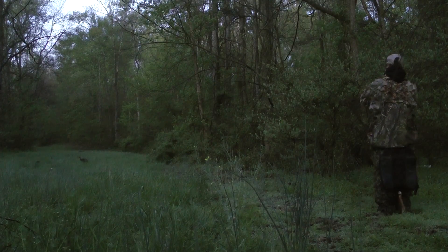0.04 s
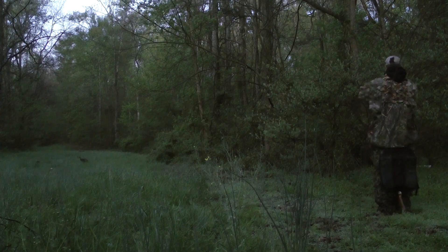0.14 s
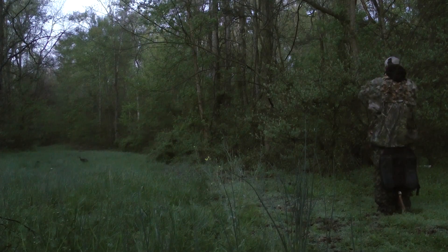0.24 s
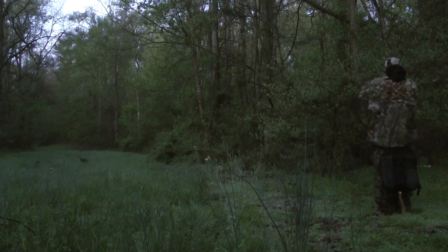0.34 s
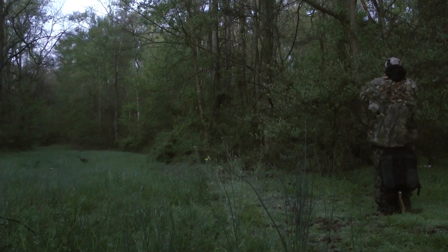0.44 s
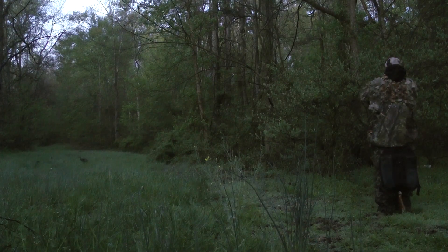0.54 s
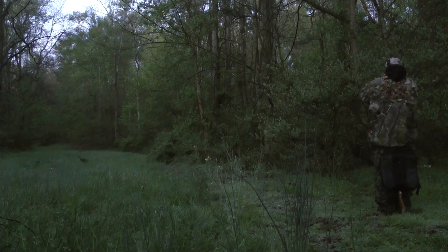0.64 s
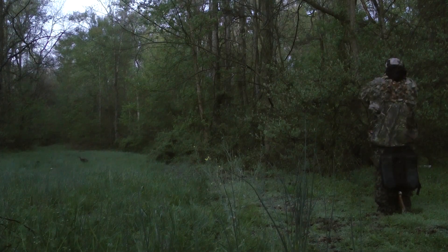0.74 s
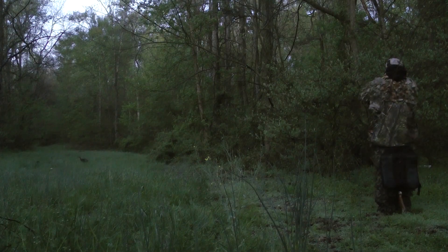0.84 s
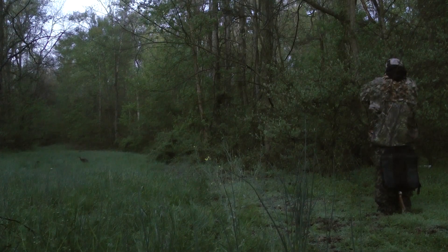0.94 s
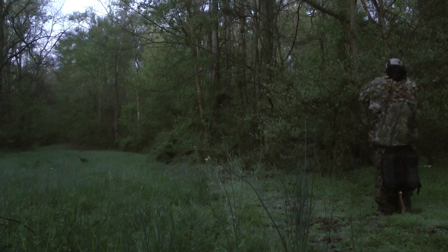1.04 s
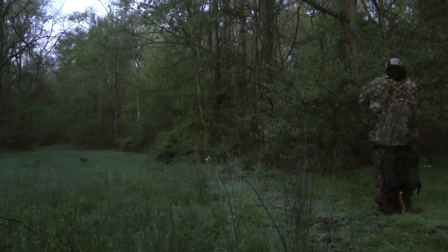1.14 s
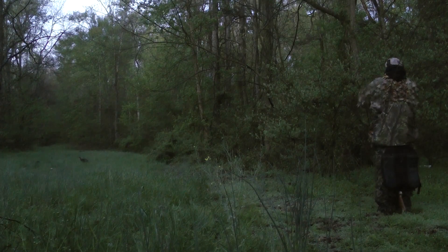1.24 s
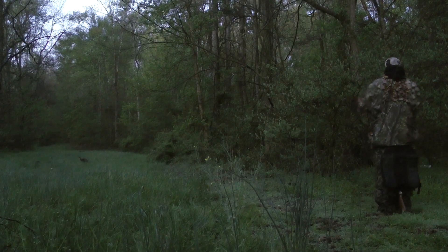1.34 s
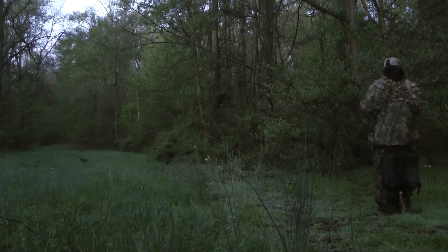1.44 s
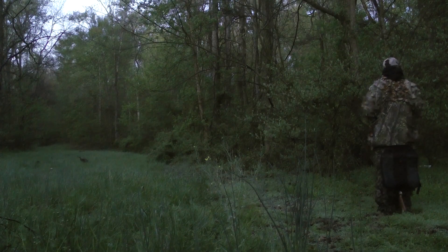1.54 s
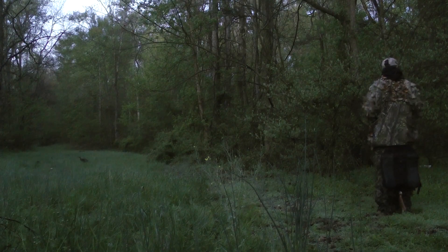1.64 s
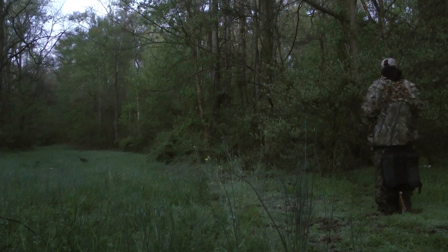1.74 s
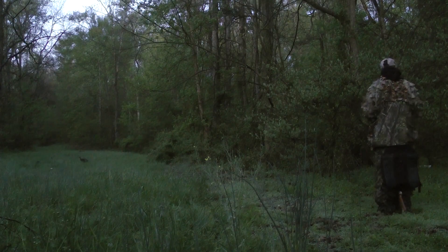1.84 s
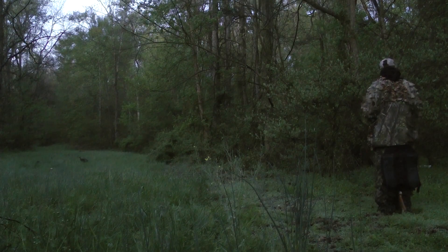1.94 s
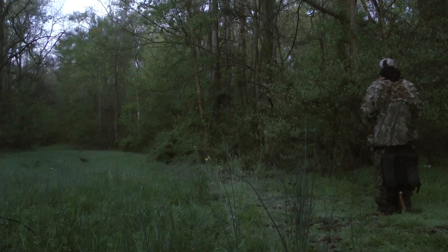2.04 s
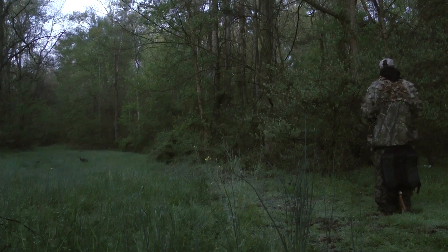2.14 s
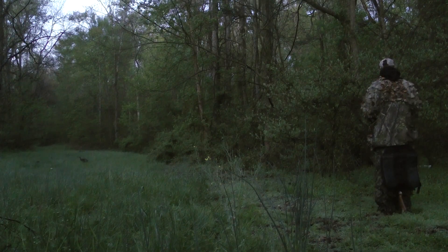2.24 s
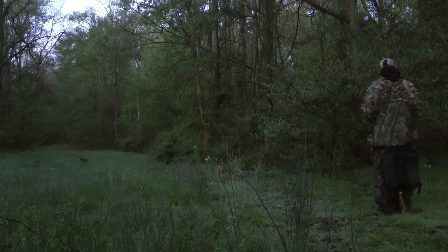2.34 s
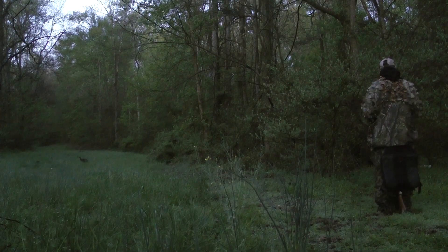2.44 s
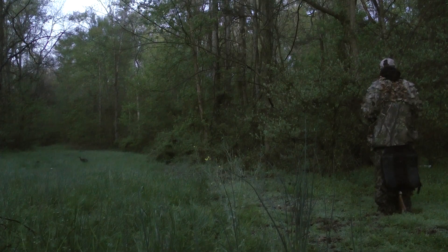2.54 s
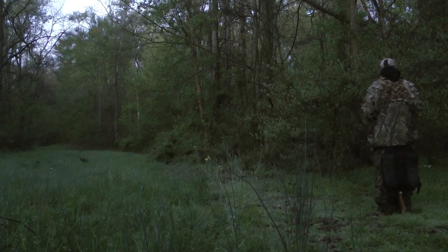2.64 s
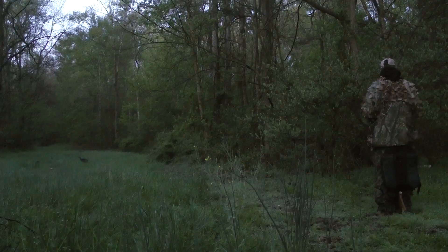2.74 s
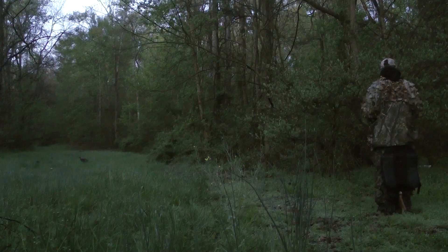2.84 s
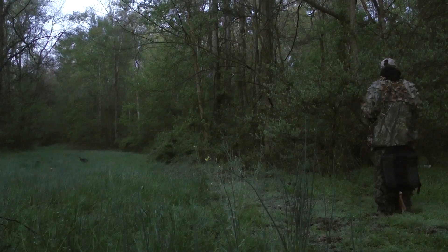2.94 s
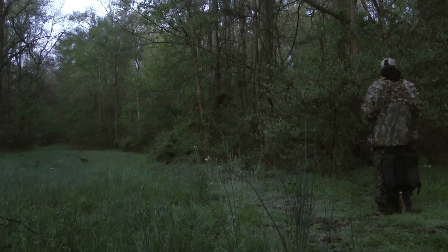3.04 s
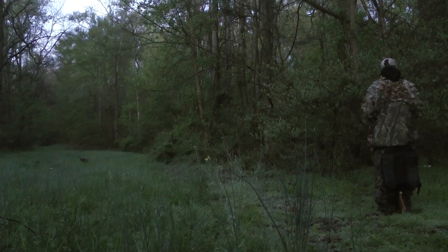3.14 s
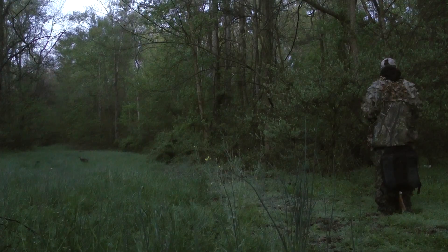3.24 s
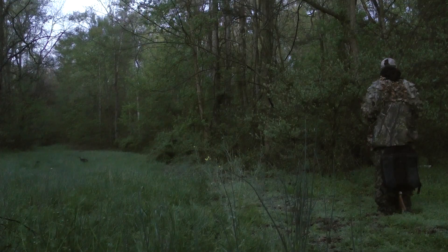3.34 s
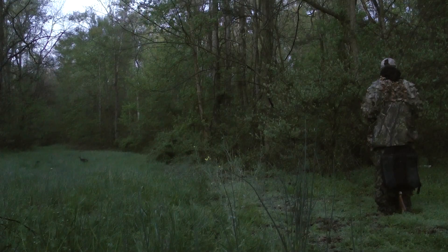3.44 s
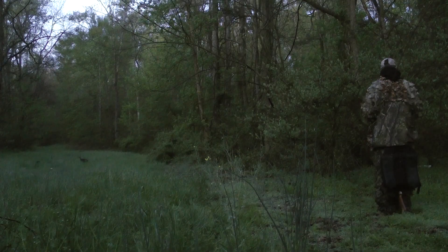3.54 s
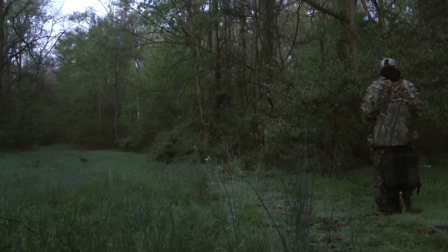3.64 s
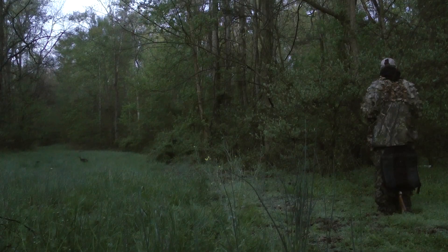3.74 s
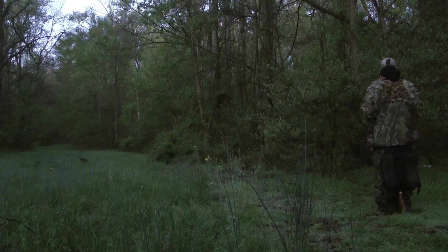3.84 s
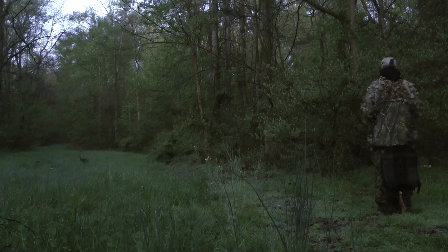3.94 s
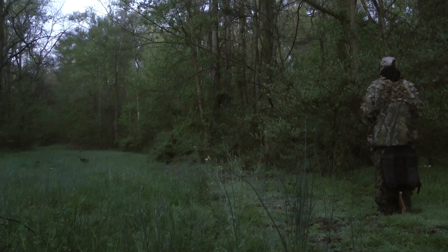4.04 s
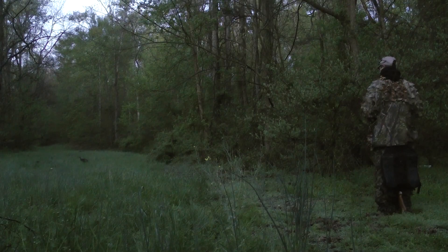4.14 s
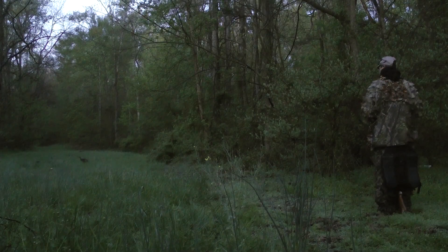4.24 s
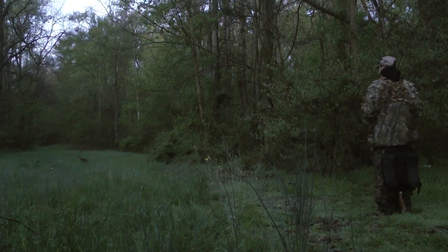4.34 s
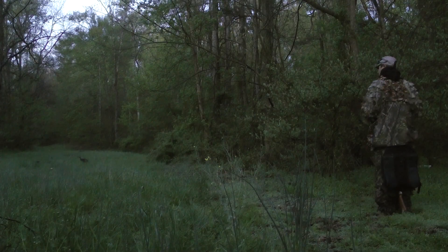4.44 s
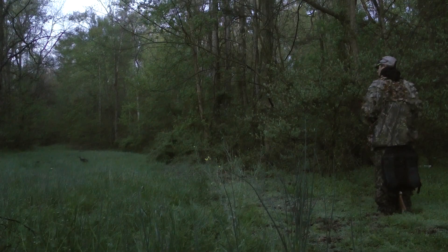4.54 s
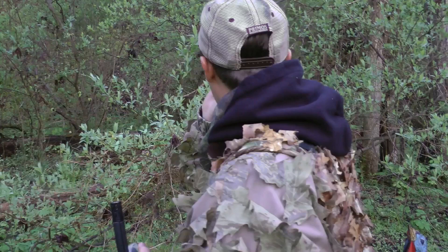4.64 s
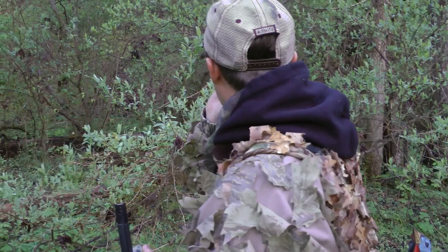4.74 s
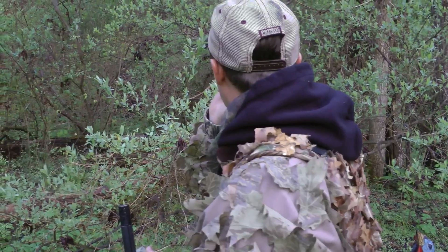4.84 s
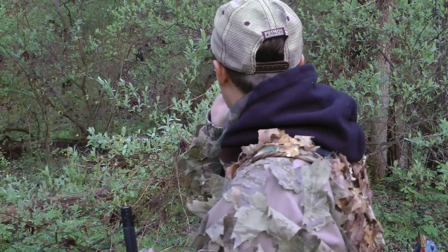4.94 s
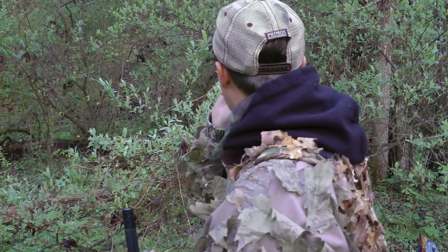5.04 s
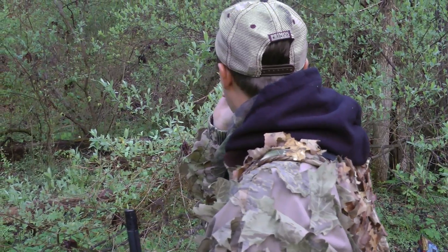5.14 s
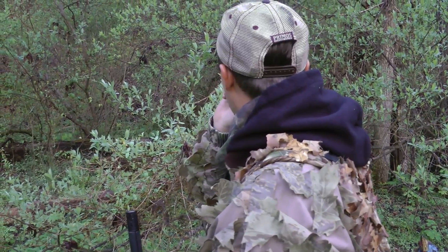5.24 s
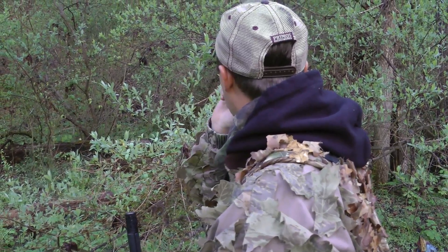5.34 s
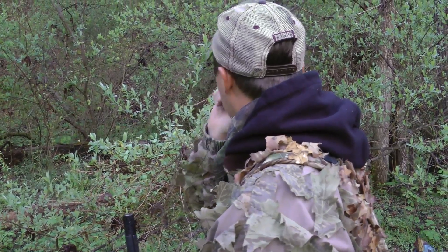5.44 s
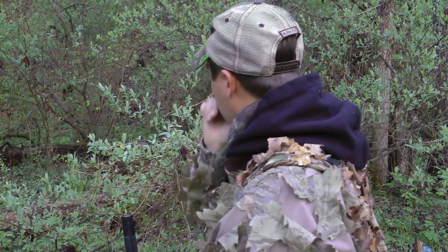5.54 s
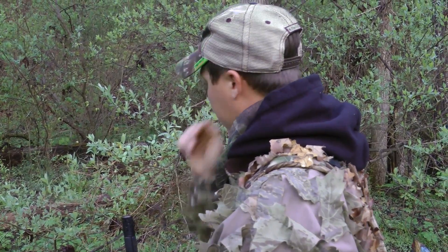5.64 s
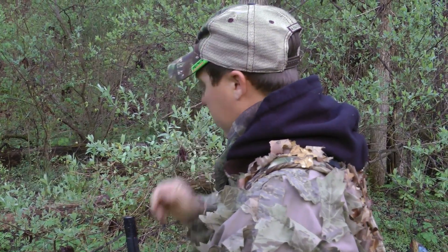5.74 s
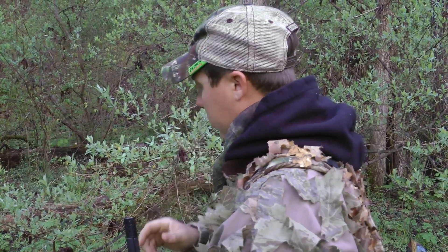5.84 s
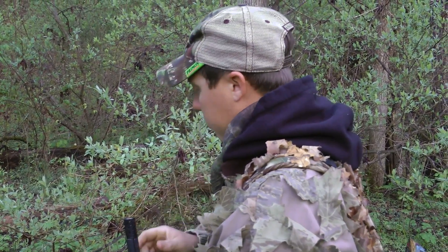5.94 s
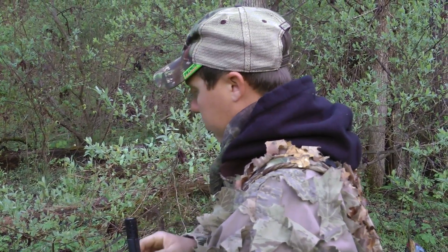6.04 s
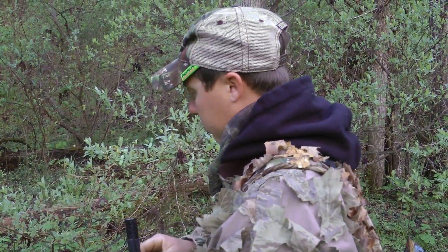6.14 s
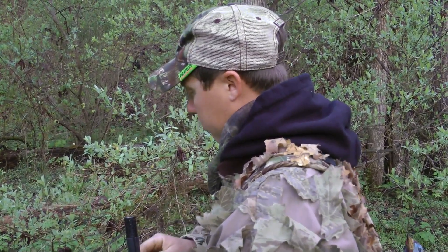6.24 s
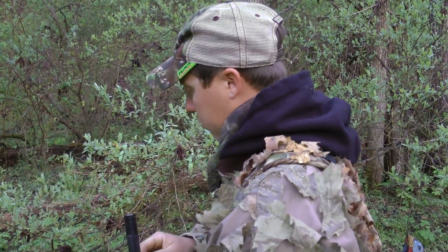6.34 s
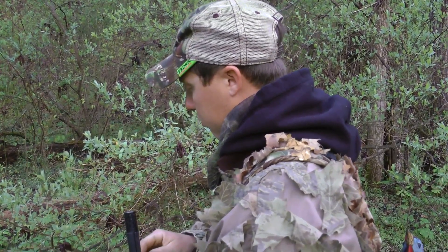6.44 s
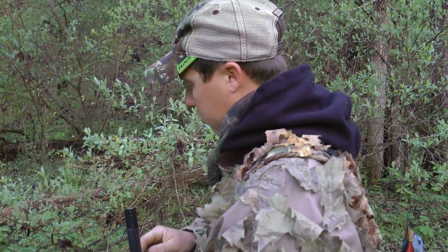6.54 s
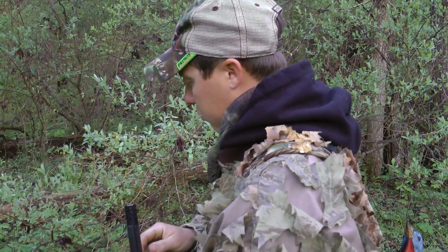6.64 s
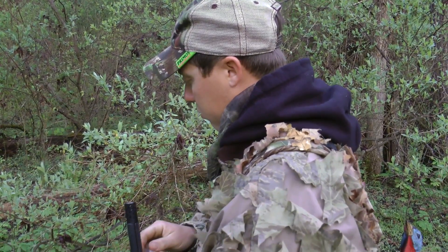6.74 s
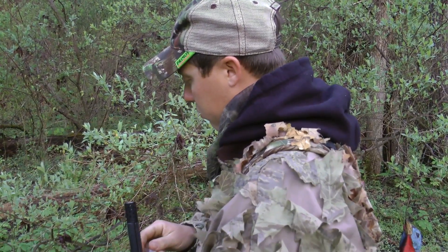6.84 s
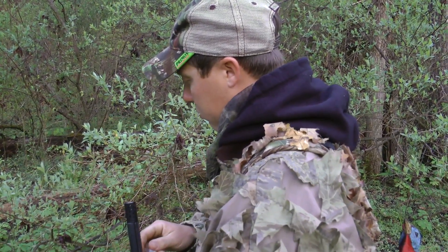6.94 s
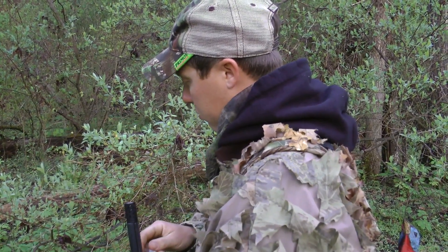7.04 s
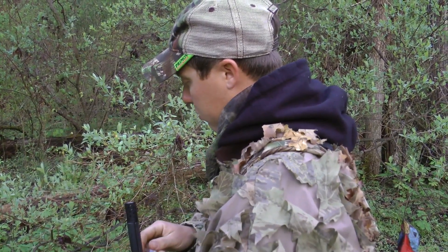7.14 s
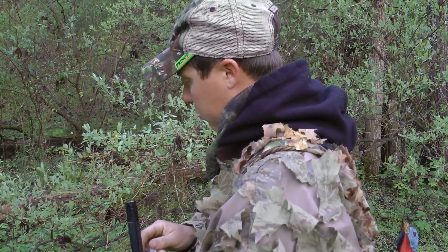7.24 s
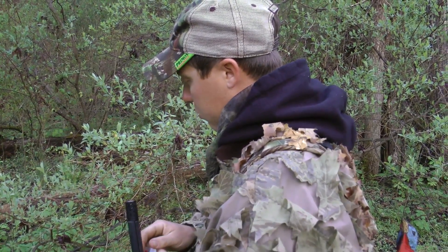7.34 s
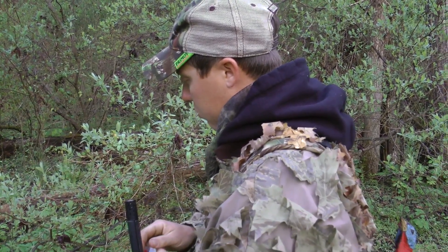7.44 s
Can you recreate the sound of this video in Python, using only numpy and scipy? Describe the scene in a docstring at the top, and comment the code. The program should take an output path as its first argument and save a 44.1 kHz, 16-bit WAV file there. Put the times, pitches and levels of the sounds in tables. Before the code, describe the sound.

A wild turkey imitation in a quiet forest, picked up in stereo and leaning slightly right. First comes one rapid bubbling gobble with reverberant tail, among thin clear bird whistles and a hushed leafy background. An abrupt scene change brings three harsh nasal yelps close to the microphone, each a fraction of a second. Their long echo dies into subdued chirps, a small bright tick and a faint rustling hiss.

```python
"""Songbirds whistle over a wash of leaves and a low drone; then a shaken reed call gobbles, push and pull in turn.
After a short silence a second woodland scene brings three hoarse notes of a blown reed call close by.
The reeds are sums of flickering partials with noise gated by each beat; birds are gliding sines, leaves and
drone shaped noise. Random taps scatter the sound off the trunks, and a gain control ducks the near notes."""
import sys
import numpy as np
from scipy import signal
from scipy.fft import rfft, irfft
from scipy.io import wavfile
from scipy.ndimage import uniform_filter1d

SR = 44100
rng = np.random.default_rng(int(sys.argv[2]) if len(sys.argv) > 2 else 0)


def master(y):
    """Save y as 16-bit WAV."""
    cut = np.clip(np.atleast_2d(y).T, -1, 1)
    pcm = np.round(cut * 32767)  # scale
    wavfile.write(sys.argv[1], SR, pcm.astype(np.int16))


N = 330750
CUT_OUT_S, CUT_IN_S = 4.742, 4.757  # silence between the far and the near scene


def amp(db):
    """Decibel law: level [dB] to amplitude ratio."""
    return 10 ** (np.asarray(db) / 20)


def evened(x):
    """Power normalisation: scales to rms 1."""
    return x / np.sqrt(np.mean(x ** 2) + 1e-20)


def read(points, hz):
    """Spectral interpolation, linear in value along a logarithmic frequency axis."""
    f, value = np.transpose(points)
    return np.interp(np.log(hz + 1), np.log(f + 1), value)


def add(mix, s, sound):
    """Superposition: adds a sound to the mix from a given second."""
    part = mix[round(s * SR):][:len(sound)]
    part += sound[:len(part)]


def drift(n, hz):
    """Low-passed random process of rms 1, changing about hz times a second."""
    span = max(int(SR / hz), 2)
    once = uniform_filter1d(rng.standard_normal(n), span, mode="wrap")
    return evened(uniform_filter1d(once, span, mode="wrap"))


def coloured(x, points):
    """Linear filtering: multiplies the spectrum by a response given in dB."""
    return irfft(rfft(x) * amp(read(points, np.fft.rfftfreq(len(x), 1 / SR))), len(x))


def hump(u, start, end, edge, quick=1):
    """Sine-squared envelope: rises after start and falls before end; the rise may be quicker."""
    nearest = np.minimum(quick * (u - start), end - u)
    return np.sin(np.pi / 2 * np.clip(nearest / edge, 0, 1)) ** 2


def partial(k, turns, db):
    """Fourier component: a cosine at k times the running phase [turns], with rms level db."""
    return np.sqrt(2) * amp(db) * np.cos(2 * np.pi * (k * turns + rng.random()))


def glide(db, start_hz, end_hz, length):
    """Frequency modulation: a linear sine sweep at 0.98 of the given pitches, under a smooth hump."""
    n = round(length * SR)
    return partial(0.98, np.cumsum(np.linspace(start_hz, end_hz, n)) / SR, db) * np.hanning(n)


def drone(hz, width_hz):
    """Narrow-band noise: two slowly drifting carriers in quadrature, nearly alike in both ears."""
    # the drone swells and sinks: (time [s], level [dB])
    drone_level = [(0.0, -52.5), (0.42, -66), (0.74, -55.5), (1.83, -54), (2.34, -51), (4.67, -58),
                   (4.74, -65)]
    waver_db, waver_per_s = 1, 4.6
    t = np.arange(N) / SR
    in_phase = drift(N, width_hz) * np.cos(2 * np.pi * hz * t)
    quadrature = drift(N, width_hz) * np.sin(2 * np.pi * hz * t)
    band = 2 * (in_phase + quadrature)
    level_db = np.interp(t, *np.transpose(drone_level)) + waver_db * drift(N, waver_per_s)
    return evened(band) * amp(level_db) * amp([[-1.2], [1.2]])


def wood(colour, db, same, side, patchy_db, swell_db):
    """Diffuse field: random short-time spectra, partly coherent between the ears, with drifting patches."""
    frames, hz = N // 512 + 5, np.fft.rfftfreq(2048, 1 / SR)
    a, b, c, d, patches = rng.standard_normal((frames, 1025, 5)).T
    patches = evened(uniform_filter1d(uniform_filter1d(patches, 20, 0), 8, 1))
    swell = drift(frames, SR / 20)  # smoothed over 20 frames
    like = np.clip(read(same, hz), -1, 1)[:, None]
    lean = amp(read(side, hz))[:, None]
    left = a + 1j * b
    right = like * left + np.sqrt(1 - like ** 2) * (c + 1j * d)
    z = np.array([left * lean, right])
    z /= np.sqrt(1 + lean ** 2 + 2 * lean * like)  # the colour holds for the sum of both ears
    z *= amp(read(colour, hz)[:, None] + patchy_db * patches + swell_db * swell)
    sound = signal.istft(z, nperseg=2048, noverlap=1536)[1][:, :N]
    return amp(db) * sound / np.std(sound.mean(0))


def rustle(start_s, rise_s, db, hz, width_hz, swell_db, swell_s):
    """Band-limited noise: an uneven treble hiss with an exponentially fading first swell."""
    colour = np.exp(-((np.fft.rfftfreq(N, 1 / SR) - hz) / width_hz) ** 4)
    hiss = evened(irfft(rfft(rng.standard_normal((2, N))) * colour, N))
    t = np.maximum(np.arange(N) / SR - start_s, 0)
    level_db = db + swell_db * np.exp(-t / swell_s) + 1.6 * drift(N, 6.)
    return amp(level_db) * hiss * np.minimum(t / rise_s, 1)


def tick(db, hz, width_hz):
    """Impulsive excitation: a band-limited noise burst decaying within milliseconds."""
    burst = rng.standard_normal(800) * np.exp(-np.arange(800) / 260.)
    colour = np.exp(-((np.fft.rfftfreq(800, 1 / SR) - hz) / width_hz) ** 4)
    return amp(db) * evened(irfft(rfft(burst) * colour))


def trees(x, t60, treble_t60, first_s):
    """Multiple scattering off trunks: sparse random-sign taps per ear, the treble dying sooner."""
    taps = np.zeros((2, 2 * SR))
    grid = np.arange(0, 2 * SR, 20)
    at = grid + rng.integers(0, 20, (2, len(grid)))
    signs = rng.choice([-1., 1.], at.shape) * (grid > first_s * SR)
    np.put_along_axis(taps, at, signs, 1)
    hz, t, z = signal.stft(taps, SR, nperseg=256)
    decay_s = read([(1500, t60), (8000, treble_t60)], hz)[:, None]
    tail = signal.istft(z * amp(-60 * t / decay_s), SR, nperseg=256)[1]
    return signal.fftconvolve(x[None], tail / np.linalg.norm(tail[0]), axes=1)[:, :N]


def chatter(per_s, low_hz, high_hz):
    """Random superposition: many short falling chips at chance moments, on eight pitches."""
    # far chatter of many birds: (time [s], level [dB])
    chatter_level = [(0, -53), (.25, -57), (1.5, -71), (4.7, -69), (5.9, -58), (6.3, -76), (6.7, -66),
                     (7.0, -56), (7.2, -67.5), (7.5, -76)]
    s, db = np.transpose(chatter_level)
    out = np.zeros(N)
    for hz in np.linspace(low_hz, high_hz, num=8):
        train = (rng.random(N) < per_s / 8 / SR) * amp(2.0 * rng.standard_normal(N))
        out += signal.oaconvolve(train, glide(0, 1.03 * hz, .97 * hz, 0.018))[:N]
    return evened(out) * amp(np.interp(np.arange(N) / SR, s, db))


def whistle(row, waver_hz, flutter_db):
    """Near-sinusoidal tone with exponential pitch glide, made uneven by its path through the leaves."""
    s, length, start_hz, end_hz, db, top = row
    glide_share, fade_db, rise_s = .25, 12, 0.011  # pitch settles early; level falls away from its top
    u = np.arange(0, length, 1 / SR) / length
    n = len(u)
    hz = end_hz + (start_hz - end_hz) * np.exp(-u / glide_share)
    turns = np.cumsum(hz + waver_hz * drift(n, 65)) / SR
    level_db = db - fade_db * abs(u - top) + flutter_db * end_hz / 4000 * drift(n, 50)
    return s, partial(1, turns, level_db) * hump(u, 0, 1, rise_s / length)


def songbirds():
    """Superposed tonal sources: whistles, chips and chatter, direct and scattered by the trees."""
    # whistles: (time [s], length [s], start pitch [Hz], settled pitch [Hz], level [dB], loudest point [share])
    whistles = [ (0, 0.19, 3584, 3523, -47, 0.504), (0, 0.15, 6560, 6600, -59.5, .2),
                (1.77, 0.11, 7720, 7640, -59, .4), (1.98, 0.17, 7790, 7790, -66, .7),
                (2.1, .17, 2770, 2840, -62, .4), (2.55, 0.2, 2760, 2750, -63, .5),
                (2.95, 0.27, 2770, 2766, -59, .4), (3.255, 0.43, 5600, 5296, -51, .45),
                (3.585, 0.24, 3780, 3812, -42, .75), (3.935, .3, 6620, 6540, -55, .45),
                (4.2, 0.29, 3470, 3550, -47.5, .5), (4.215, 0.13, 2750, 2700, -50, .25),
                (4.285, .05, 2500, 2250, -52.5, .3), (4.365, 0.11, 2540, 2503, -49, .2),
                (4.505, 0.18, 2690, 2628, -49, .2), (4.565, .1, 2380, 2230, -57.5, .4),
                (4.63, 0.096, 2530, 2540, -51.5, .6), (6.29, .22, 2450, 2590, -64, .3),
                (6.41, 0.37, 3670, 3644, -57.5, .4), (6.54, .35, 2060, 2137, -60, .3),
                (6.64, 0.45, 3100, 3220, -63, 0.45), (6.657, 0.16, 7100, 7020, -72, .5),
                (6.77, 0.15, 6520, 6480, -70, .2), (6.72, 0.17, 2600, 2720, -64, .8),
                (6.88, 0.2, 2520, 2730, -55, .35), (7.24, 0.24, 2470, 2410, -64, .25)]
    # chips, sounding at 0.98 of these pitches: (time [s], level [dB], start [Hz], end [Hz], length [s])
    chips = [(5.814, -61, 4150, 5414, 0.03), (6.276, -60, 2986, 2460, 0.021),
             (6.325, -71, 2970, 2480, 0.028), (6.352, -59.5, 2950, 2510, 0.028),
             (6.395, -55, 3200, 2660, 0.021), (7.197, -61, 4010, 3290, 0.0193),
             (7.224, -58, 4000, 3300, 0.02), (7.265, -59.5, 3900, 3170, 0.039)]
    birds = np.zeros(N)
    for row in whistles:
        add(birds, *whistle(row, waver_hz=14., flutter_db=3.2))
    for s, *chip in chips:
        add(birds, s, glide(*chip))
    birds = birds + chatter(per_s=220.0, low_hz=2453, high_hz=3420)
    return birds * amp([[-6], [2.5]]) + amp([[-12], [-5]]) * trees(birds, 0.94, 0.85, 0.011)


def stroke(row, wobble, air, squeak_hz):
    """Reed excitation: bellows air flaps a loose reed, its pitch arching with pressure; each flap gates hiss."""
    # kinds of stroke: (pitch top [share of stroke], pitch fall [share], flutter [dB]; then relative to
    # partial 3: partial 1 [dB], partial 2 [dB], squeak at the catch [dB], partial 2 at the stall [dB])
    kinds = {"push": (.33, .28, 1.3, -11, -18, -3, -6), "pull": (.4, .03, 2.2, -3, -5, -21, -21),
             "jerk": (.1, .22, 1.6, -15, -12, -12, -9), "slack": (.04, .34, 2.6, -4, 26, 2, 5)}
    # colour of the rasp: (frequency [Hz], level [dB])
    tube_colour = [(450, -39.5), (650, -2), (1100, -9), (1850, -1.5), (2200, -12.5), (2500, -7.5),
                   (2850, -9), (3450, -13), (3780, 1), (4100, -12), (5600, -7.5), (6700, -15),
                   (8500, -24.5), (15500, -26.5)]
    s, length, top_hz, db3, rasp_db, kind = row
    top, fall, flutter_db, db1, db2, squeak_db, stall_db = kinds[kind]
    taut_hz = top_hz - 624.2  # a tauter reed strengthens the low partials
    db1 = db3 + db1 + 0.1565 * taut_hz
    db2 = db3 + db2 + 0.3117 * taut_hz
    squeak_db, stall_db = db3 + squeak_db, db3 + stall_db

    n = 5000
    u = np.arange(n) / (length * SR)  # share of the stroke
    rising = np.clip(1 - u / top, 0, 1) ** 2
    falling = np.clip((u - top) / (1 - top), 0, 1) ** (1 + 3.6 * top)
    hz = top_hz * (1 - .11 * rising - fall * falling)
    turns = np.cumsum(hz * (1 + wobble * drift(n, 180))) / SR

    first, second, third, stall = (partial(k, turns, db + flutter_db * drift(n, 134))
                                   for k, db in ((1, db1), (2, db2), (3, db3), (2, stall_db)))
    firm = first * hump(u, 0, 0.84, 0.22) + third * hump(u, .01, 0.85, 0.15, quick=2.0)
    firm += second * hump(u, 0.046, 0.81, 0.26, quick=1.1) + stall * hump(u, 0.63, 0.99, 0.13)
    squeak = partial(1, squeak_hz * np.arange(n) / SR, squeak_db) * hump(u, -0.016, 0.31, 0.17)

    upper = sum(partial(k, turns, read(tube_colour, k * hz) + 2 * flutter_db * drift(n, 235))
                for k in range(4, 16))
    gate = 0.19 + np.exp(-(turns % 1) / 0.23)  # opens at each flap
    hiss = coloured(gate * rng.standard_normal(n), tube_colour)
    rasp = (1 - air) * evened(upper) * hump(u, 0.036, 1.0, 0.25, quick=1.4)
    rasp += air * evened(hiss) * hump(u, 0.034, 1.446, 0.33, quick=1.24)
    return s, firm + squeak + amp(rasp_db) * rasp


def shaken_call():
    """Reversing airflow: push and pull strokes in turn, with a slap of the bellows at the first."""
    # strokes: (time [s], length [s], top pitch [Hz], partial 3 [dB], rasp [dB], kind)
    strokes = [ (0.193, 0.037, 709, -39, -32.5, "pull"), (0.249, 0.052, 634, -32, -33.5, "push"),
               (0.309, 0.038, 681, -39, -30.5, "pull"), (0.365, 0.053, 633, -31.5, -32, "push"),
               (0.424, 0.045, 650, -36, -27.5, "pull"), (0.486, 0.05, 630, -28.5, -28, "push"),
               (0.548, 0.043, 632, -31.5, -26.5, "pull"), (0.61, 0.055, 617, -26.5, -29.5, "push"),
               (0.675, 0.05, 624.8, -30.5, -25.5, "pull"), (0.741, 0.049, 623, -24.5, -29.5, "push"),
               (0.8, 0.044, 637, -32.5, -25.5, "pull"), (0.867, .05, 621.3, -25.5, -31, "push"),
               (0.927, 0.0454, 628, -31, -25.5, "pull"), (0.991, 0.046, 620.5, -25, -29, "push"),
               (1.06, 0.043, 624.2, -23, -30.5, "jerk"), (1.119, 0.052, 544.4, -37, -40, "slack"),
               (1.174, 0.03, 631.5, -22.5, -30, "jerk"), (1.239, .098, 553.5, -40.5, -44, "slack")]
    # slap of the bellows: (time [s], level [dB], centre [Hz], half width [Hz])
    slap = (.197, -30, 2300, 1000)
    gobble = np.zeros(N)
    for row in strokes:
        add(gobble, *stroke(row, wobble=.006, air=.48, squeak_hz=1400))
    add(gobble, slap[0], tick(*slap[1:]))
    return gobble


def blowing(start, fullest, end, full_s, low_hz, bow_hz, beat_db, db, rough):
    """Reed transients: it catches high, settles, swells and stalls; gives pitch, levels and roughness."""
    # levels of catch, stall and swell hold for partial 2; the other parts take their own shares
    catch_s, catch_hz, catch_db = .015, 229, 11.5  # the reed starts high and loud
    settle_s, settle_db = 0.022, 11.5  # partial 1 jumps as the reed settles
    stall_s, stall_hz, stall_db = .011, 147, 23.5  # the reed rises and dies at the end
    burst_s = .009  # partial 2 bursts this long after the start
    swell_db, rough_ends = 9, 0.71  # swell of the full part; roughness outside it
    air_tail_s, dying_db_per_s = .014, 1500  # air leaks on after the stall while partial 1 dies

    t = np.arange(start, end + air_tail_s, 1 / SR)
    thin = 1 - np.exp(-((t - fullest) / full_s) ** 2)  # 0 when fullest
    catch = np.exp(-((t - start) / catch_s) ** 2)
    stall = np.exp(np.minimum(t - end, 0) / stall_s)
    settle = np.exp(-(2 * (t - start - settle_s) / catch_s) ** 2)
    burst = np.exp(-((t - start - burst_s) / (1.01 * catch_s)) ** 2)

    hz = low_hz + bow_hz * thin + catch_hz * catch + stall_hz * stall
    rough = np.clip(rough + (rough_ends - rough) * thin, 0, 1)
    db1 = db - 17.5 - 0.39 * swell_db * thin + 0.59 * catch_db * catch + settle_db * settle
    db1 = db1 - .2 * stall_db * stall - dying_db_per_s * np.maximum(t - end, 0)
    db2 = db - swell_db * thin + catch_db * burst - stall_db * stall
    # above 767 Hz partial 3 leaves the barrel's passband: 0.5 dB per Hz, 37 dB at most
    db3 = db - swell_db * thin - 3 - np.clip(0.5 * (hz - 767), 0, 37)
    upper_db = db - 16.5 - 0.42 * swell_db * thin - 0.72 * stall_db * stall
    beat_db = beat_db + 16.5 * rough - catch_db * catch  # the beat grows with roughness
    beat_db = beat_db + .4 * settle_db * settle - 1.7 * stall_db * stall
    return hz, db1, db2, db3, upper_db, beat_db, rough


def note(row, wobble, air_db):
    """Period doubling: a stiff reed beats strong-weak, so half lines lie between partials; the barrel colours."""
    # colour of beat, upper partials and air: (frequency [Hz], level [dB])
    barrel_colour = [(300, -30), (1100, -16.5), (1500, -2), (1900, 2.5), (2300, -13), (2650, -19),
                     (3000, -14), (3350, -19.5), (4300, -7.5), (4800, -23.5), (5500, -35), (7400, -29),
                     (8300, -30), (9200, -17.5), (10200, -46.5)]
    hz, db1, db2, db3, upper_db, beat_db, rough = blowing(*row)
    n = len(hz)
    turns = np.cumsum(hz * (1 + wobble * rough * drift(n, 200))) / SR
    firm = partial(1, turns, db1) + partial(2, turns, db2) + partial(3, turns, db3)
    upper = sum(partial(k, turns, read(barrel_colour, k * hz) + 1.5 * drift(n, 120)) for k in range(4, 7))
    slip = np.cumsum(55. * rough ** 2 * drift(n, 150)) / SR  # the beat keeps losing its step
    beat = sum(partial(1, (k + .5) * turns + slip,
                       read(barrel_colour, (k + .5) * hz) + 2.5 * drift(n, 120)) for k in range(7))
    gate = 0.3 + np.exp(-(turns % 1) / 0.052)  # opens at each beat of the reed
    air = evened(coloured(gate * rng.standard_normal(n), barrel_colour))

    upper_share = np.clip(1 - 0.24 * rough ** 2, 0, 1)
    bright = upper_share * evened(upper) + amp(air_db) * (0.67 + rough ** 2) * air
    sound = firm + amp(upper_db) * bright + amp(beat_db) * beat
    edge = np.minimum(1, np.minimum(np.arange(n) / 60., np.arange(n)[::-1] / 160.0))
    return row[0], sound * edge


def blown_call():
    """Reed and resonator: three hoarse notes, the barrel whistling just before each reed starts and ends."""
    # notes: (start [s], fullest [s], end [s], width of full part [s], lowest pitch [Hz], bow of pitch [Hz],
    # strong-weak beat [dB], level [dB], roughness when fullest [0-1])
    notes = [(4.722, 4.792, 4.866, 0.038, 729.5, 45.5, -43.5, -19, 0.26),
             (5.002, 5.074, 5.163, 0.027, 742.4, 37.7, -46.5, -19.5, 0.4),
             (5.291, 5.373, 5.45, 0.036, 750, 15.36, -43.5, -20, 0.37)]
    # barrel whistles, sounding at 0.98 of the pitch: (level relative to the note [dB], pitch [Hz], length [s])
    start_pip = (-2, 1435, .013)
    stall_pip = (-18, 1400, .024)
    start_lead_s, stall_lead_s = .007, .008
    blown = np.zeros(N)
    for row in notes:
        add(blown, *note(row, wobble=.005, air_db=2))
        start, end, level_db = row[0], row[2], row[-2]
        for s, (db, hz, length) in ((start - start_lead_s, start_pip), (end - stall_lead_s, stall_pip)):
            add(blown, s, glide(level_db + db, hz, hz, length))
    return blown


def scene():
    """Direct and reverberant fields: far scene, short silence, near scene, with birds in both."""
    # colour of each wood: (frequency [Hz], level [dB]); its overall level [dB]
    far_colour, far_db = [(20, -40), (50, -9), (110, -12), (170, -15), (400, -17.5), (480, -25.5),
                          (730, -19.5), (950, -27.5), (1400, -23.5), (2700, -17.5), (3200, -21.5),
                          (6000, -25), (9000, -32.5), (15800, -40.5)], -51.5
    near_colour, near_db = [(15, -57), (25, -8), (76, 0.5), (241, -8), (299, -2), (500, -16), (572, -14.5),
                            (769, -13.5), (955, -26.5), (1590, -20.5), (2660, -11.5), (3990, -21),
                            (8490, -33), (14200, -33.5), (15800, -40)], -56
    # coherence of left and right: (frequency [Hz], likeness [-1 to 1])
    far_same, near_same = [(60, 0.86), (180, 0.47), (550, -0.58), (1650, -0.51), (4970, -0.28),
                           (15000, -0.43)], [(60, 0.99), (180, 0.2), (550, -0.24), (1650, -0.16),
                                             (4970, -0.37), (15000, -0.23)]
    # left minus right: (frequency [Hz], level difference [dB])
    far_side, near_side = [(60, -2), (180, -1), (550, -6.5), (1650, -9.5), (4970, -12), (15000, -17.5)], [(60, 0.5), (180, 0), (550, 0.5), (1650, -9.5), (4970, -12),
                                             (15000, -14)]
    # colour of the gobble's echo: (frequency [Hz], level [dB])
    aside = [(600, -9), (1100, -9), (1850, -2), (3800, 2), (9000, -2)]
    # the blown call points away, so its echo comes back brighter: (frequency [Hz], level [dB])
    behind = [(700, -2.5), (1500, -4), (1900, -3.5), (2300, 1), (3000, 12), (4600, 3.5), (8000, -4)]
    # soft bright tick: (time [s], level [dB], centre [Hz], half width [Hz])
    soft_tick = (6.697, -54, 4900, 1500)
    # treble hiss that rises with the tick and stays:
    # (level [dB], centre [Hz], half width [Hz], first swell [dB], decay of the swell [s])
    treble_hiss = (-68.5, 5300, 2000, 8, 0.5)

    birds = songbirds()
    gobble = shaken_call()
    far = gobble * amp([[-5], [3]])
    far = far + amp([[-11], [-4]]) * trees(coloured(gobble, aside), 1.0, 0.74, 0.012)
    far = far + wood(far_colour, far_db, far_same, far_side, patchy_db=1.43, swell_db=.35)
    far = far + drone(hz=81.2, width_hz=12.6)

    blown, click = blown_call(), np.zeros(N)
    add(click, soft_tick[0], tick(*soft_tick[1:]))
    near = blown * amp([[3.5], [7.5]])
    near = near + amp([[-22], [-17]]) * trees(coloured(blown, behind), 2.44, 1.94, 0.072)
    near = near + click * amp([[-6], [2.5]]) + amp([[-8], [-1.5]]) * trees(click, 0.8, 0.48, 0.0092)
    near = near + wood(near_colour, near_db, near_same, near_side, patchy_db=2.5, swell_db=1.93)
    near = near + rustle(6.7, .02, *treble_hiss) * amp([[-6], [2.5]])

    t = np.arange(N) / SR
    fade_in = np.clip((t - CUT_IN_S) / .0015, 0, 1)
    return (far + birds) * (t < CUT_OUT_S) + (near + birds) * fade_in


def record(dry):
    """Dynamic compression: near-scene gain falls on each note and recovers slowly; then a low-pass band limit."""
    power_db = 10 * np.log10(abs(uniform_filter1d((dry ** 2).mean(0), 300)) + 1e-12)
    near = np.arange(N) > CUT_IN_S * SR
    fall = np.arange(N) * 32.0 / SR  # the held peak falls 32 dB a second
    held_db = np.maximum.accumulate(np.where(near, power_db, -99) + fall) - fall
    over_db = np.maximum(held_db + 35.5, 0)  # excess over a threshold of -35.5 dB
    ducked = dry / amp(0.27 * uniform_filter1d(over_db, 150))
    low_pass = signal.firwin(511, 15850, window=("kaiser", 9), fs=SR)
    return signal.oaconvolve(ducked, low_pass[None], "same")


dry = scene()
out = record(dry)
master(out)
```